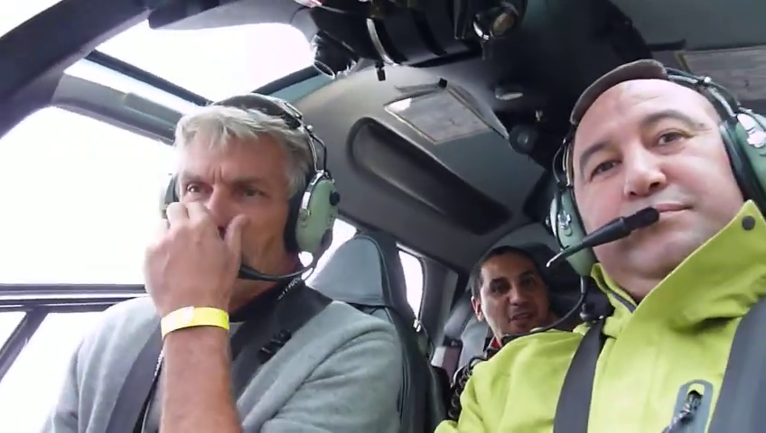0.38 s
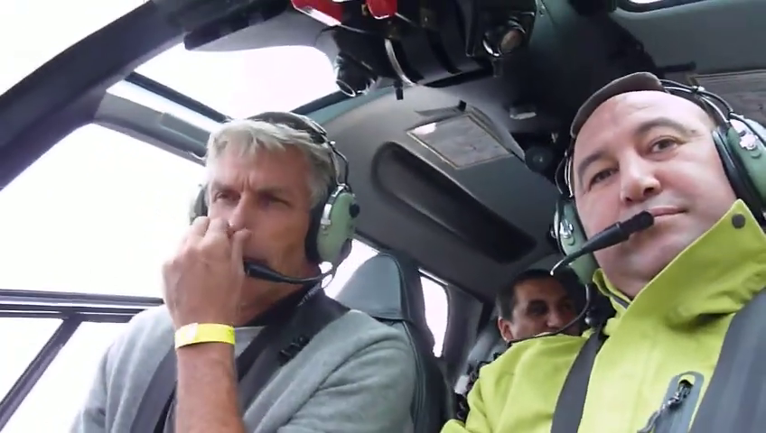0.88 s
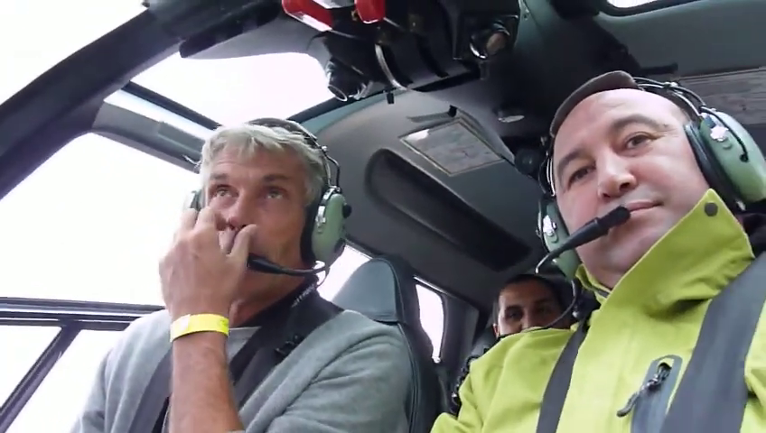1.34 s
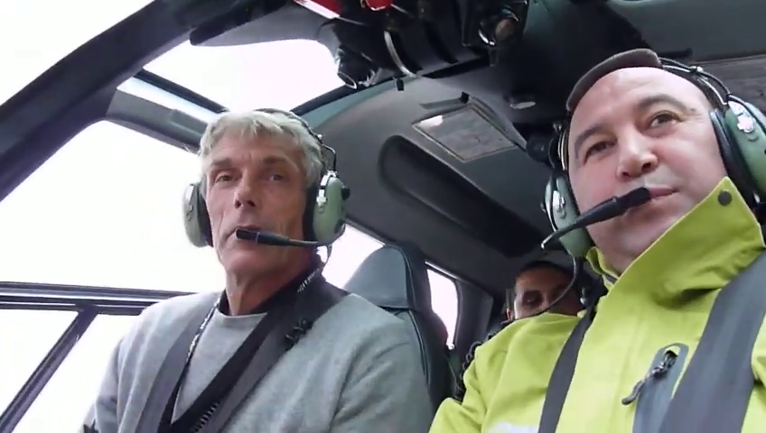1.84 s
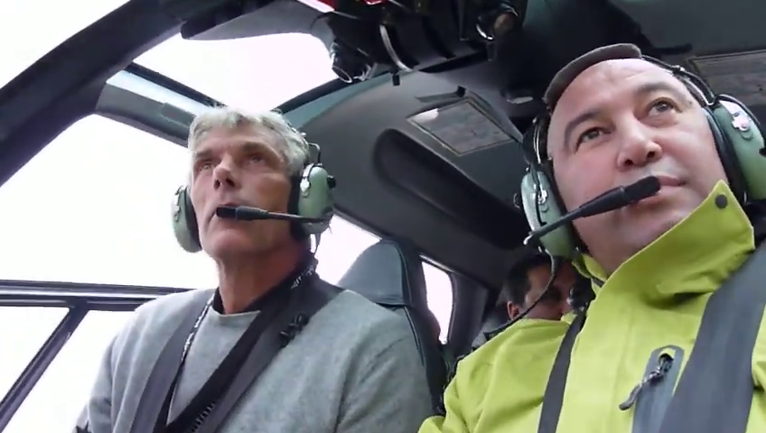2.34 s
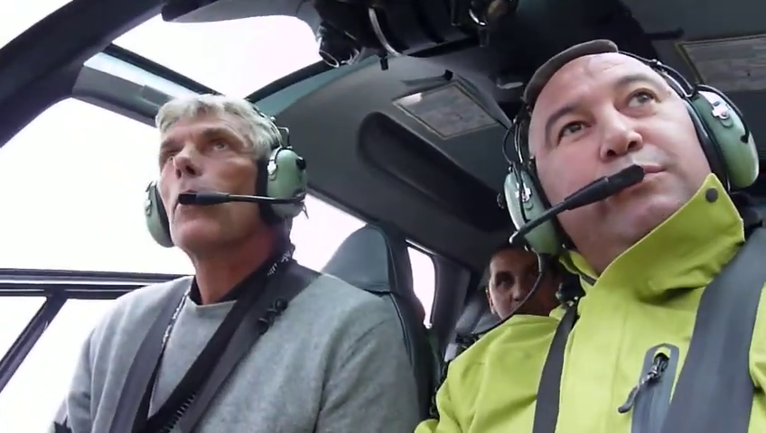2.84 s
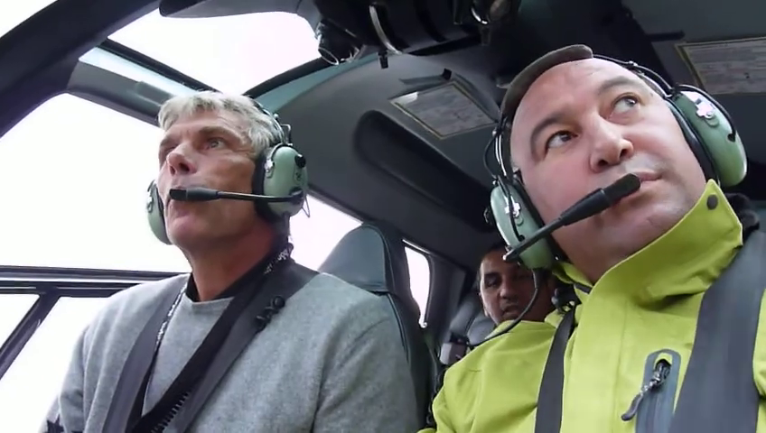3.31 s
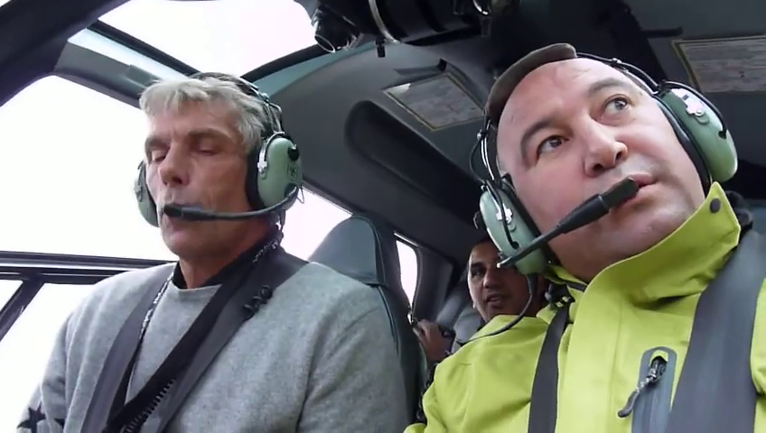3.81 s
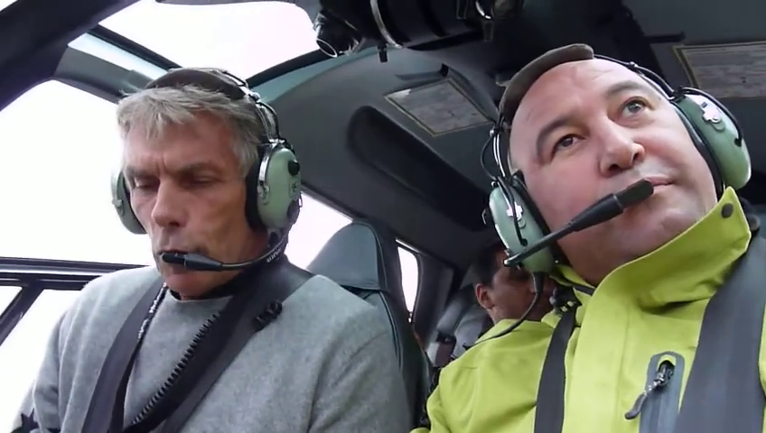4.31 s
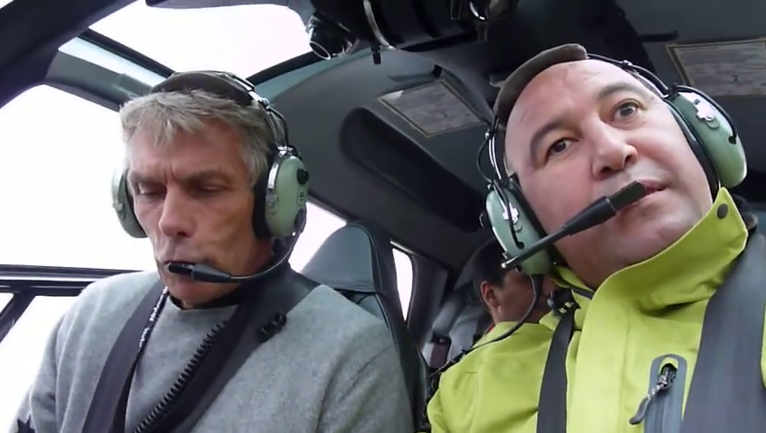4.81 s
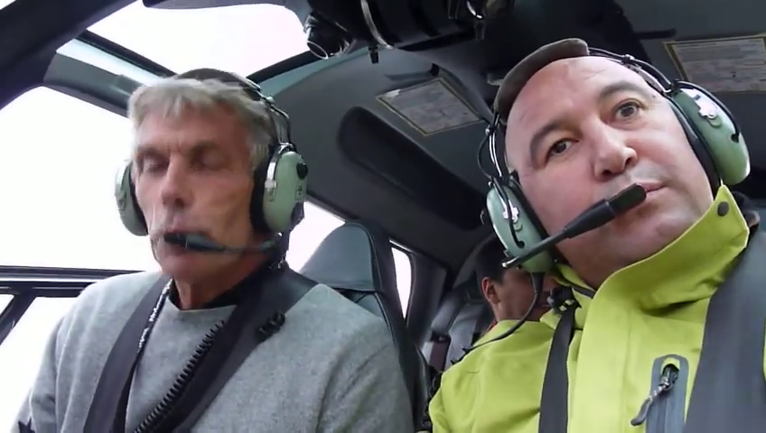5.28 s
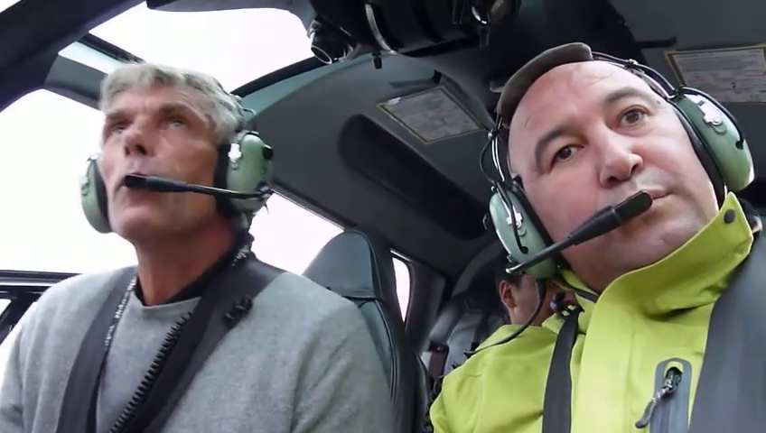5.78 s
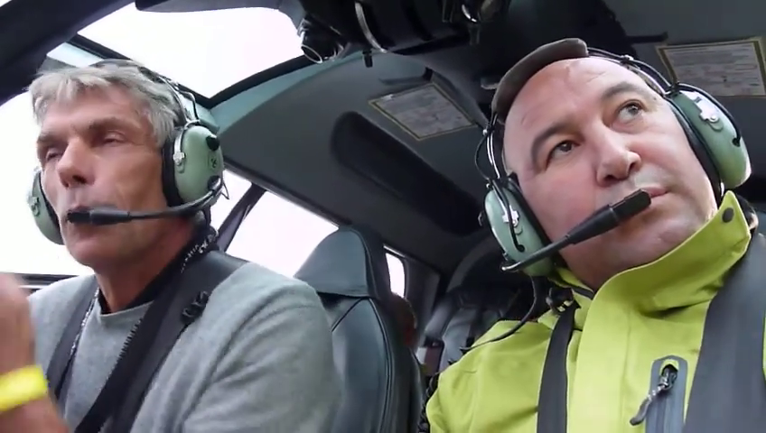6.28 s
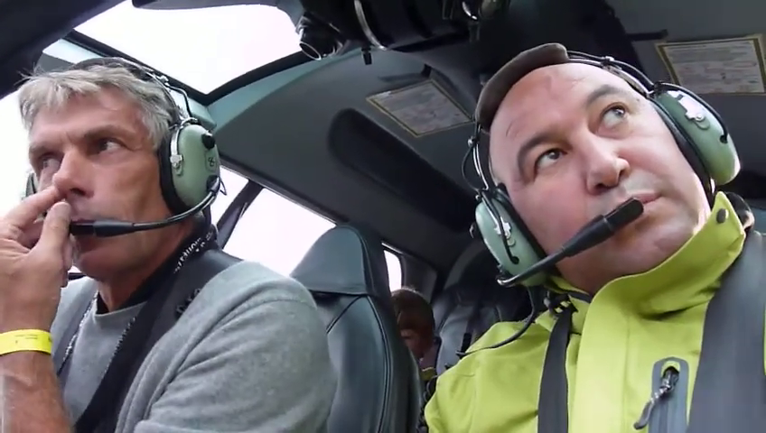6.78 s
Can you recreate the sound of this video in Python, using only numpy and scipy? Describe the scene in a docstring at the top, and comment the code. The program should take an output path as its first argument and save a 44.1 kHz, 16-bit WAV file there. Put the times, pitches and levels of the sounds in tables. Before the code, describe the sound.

A continuous helicopter interior drone, heard from between the front seats. Rapid rotor pulses blur into a fluttering throb over thick airframe rumble, with a steady low hum that weakens near the end. A panel drones more strongly through the middle, thin gear tones waver, and air and turbine hiss sit quietly on top. Small stereo recorder, bass centred, airy noise wider, limited treble.

```python
"""Inside a helicopter cabin in steady flight, heard in stereo between the front seats.
Each blade passage thumps the airframe (harmonics of the blade rate) and makes the noise throb.
The cabin booms (noise through its modes) and one panel drones; shafts hum and gears sing (wavering sines).
Air rushes past the skin (broad noise) and the turbine hisses (resonant noise). The small recorder cuts broad
notches with sharp nulls and a steep edge in the treble; its resampling leaves a thin whistling band at 8 kHz."""
import sys
import numpy as np
from scipy import signal
from scipy.fft import rfft, irfft, next_fast_len
from scipy.io import wavfile

SR = 44100
rng = np.random.default_rng(int(sys.argv[2]) if len(sys.argv) > 2 else 0)


def transcribe(signal):
    """Save signal, clipped to [-1, 1], as a 16-bit WAV file at the path in sys.argv[1]."""
    frames = np.atleast_2d(signal).T
    limited = np.clip(frames, -1, 1)
    pcm = np.round(limited * 32767).astype(np.int16)
    wavfile.write(sys.argv[1], SR, pcm)


def invert_db(level):
    """Linear amplitude ratio for a level in decibels (20 dB per decade), elementwise."""
    return 10 ** (np.asarray(level, dtype=float) / 20)


N = 303849
BLADE_HZ, FIRST_BLADE_S = 20.822, 0.0054

# level of the air rush outside: (time [s], level [dB])
RUSH_LEVEL = [(0, -32.5), (.5, -33), (1.2, -34.5), (1.9, -33), (2.5, -33.6), (4.1, -31.5), (5.8, -33.5),
              (6.89, -33)]
# air rush on the skin: (frequency [Hz], relative level per Hz [dB], left-right likeness [0-1], left-right [dB])
RUSH_SPECTRUM = [(20, -0.5, .1, -2.5), (300, -2.5, 0.2, 3.5), (1000, 8.5, 0.82, 3.5), (2000, 0, 0, 2),
                 (3200, 0, 0, -2.5), (4350, -6.5, 0.7, 6.5), (5000, -5, .3, -1.5), (6200, -5.5, 0.1, -1),
                 (6940, -8, 0.03, 0.5), (7460, -9.5, 0, -1), (8300, -17, 0.07, -1), (9050, -20, 0.1, -1)]
# resonances of the turbine hiss: (frequency [Hz], width [Hz], level [dB])
HISS_RESONANCES = [(3704, 380, 0.5), (4410, 330, -14)]
# centre of the turbine whine: (time [s], frequency [Hz])
WHINE_CENTRE = [(0, 3616), (.9, 3728), (1.8, 3720), (2.4, 3640), (4.0, 3750), (5.3, 3692), (6.89, 3720)]
# shaft hums and light gear meshes: (frequency [Hz])
LIGHT_TONE_HZ = [51.1, 191.4, 479.1, 500, 1635, 1688.3, 2287, 3486]
# the same tones: (rms level before wavering [dB], waver [dB], left-right [dB])
LIGHT_TONES = [(-56, 2.5, -2.5), (-39, 0.5, -1), (-54, 2.5, 0), (-55.5, 1, 5.5), (-54.5, 1, -4.5),
               (-60, 4.5, -2.5), (-62, -0.5, -11), (-60.5, 3, 4.5)]
# lines of the main gear: (frequency [Hz])
MAIN_GEAR_HZ = [1743.5, 2193.7, 2221.3]
# the same lines: (level against the mesh [dB], left-right [dB])
MAIN_GEAR_LINES = [(1, -1.5), (-5.5, -3), (-8, 0.5)]
# cabin boom without its modes: (frequency [Hz], relative level per Hz [dB])
BOOM_SPECTRUM = [(15, -39), (22, -18), (34, -18.5), (70, -8), (92, -12.5), (170, -6.5), (290, -12),
                 (490, -12.5), (800, -15), (1200, -23), (1700, -27.5), (2300, -31), (3200, -37.5),
                 (6000, -47.5), (9000, -50)]
# cabin and panel modes: (frequency [Hz], width [Hz], lift [dB])
CABIN_MODES = [(112.4, 14, 4), (135.5, 27.8, 7), (207, 25, 3.5), (246.5, 30.4, 7.5), (316, 18, 4.5),
               (367, 15, 2), (410.7, 25.4, 7.5), (452.4, 20, 3.5), (545, 17, 2.5), (880, 37, -0.5),
               (1078, 110, 3), (1332, 96, 5), (1484, 80, 3)]
# rotor thump: (multiple of the blade rate, rms level before swells [dB])
ROTOR_ORDERS = [(1, -36), (2, -29), (3, -35.5), (4, -36), (5, -42), (6, -30)]
# recorder notches: (frequency [Hz])
NOTCH_HZ = [2595, 4597, 5426, 7903, 8096]
# the same notches: (width [Hz], width of the null [Hz])
NOTCH_WIDTHS = [(830, 15), (750, 12), (392, 12), (600, 8), (298, 5)]


def rms_one(x):
    """Scales to rms 1, taken over all channels together."""
    return x / np.sqrt(np.mean(x ** 2) + 1e-20)


def in_time(rows):
    """One curve per column, sample by sample."""
    s, *columns = np.transpose(rows)
    return [np.interp(np.arange(N) / SR, s, column) for column in columns]


def over_hz(rows):
    """One curve per column over the spectral lines, on a log frequency axis."""
    hz, *columns = np.transpose(rows)
    lines = np.log(np.arange(1, N // 2 + 2) * SR / N)
    return [np.interp(lines, np.log(hz), column) for column in columns]


def drift(corner_hz):
    """Slow chance through two equal one-pole low-passes, run in; spread 1."""
    hop = 40  # samples between the points of the slow curve
    r = np.exp(-2 * np.pi * corner_hz * hop / SR)
    white = rng.standard_normal(N // hop + 2002)
    slow = signal.lfilter([1], [1, -2 * r, r * r], white)[2000:]
    slow = rms_one(slow - slow.mean())
    return np.interp(np.arange(N) / hop, np.arange(len(slow)), slow)


def spell(from_s, to_s, fade_s, lift_db):
    """A change in dB that fades in, holds and fades out."""
    s = np.arange(N) / SR
    return lift_db * (np.tanh((s - from_s) / fade_s) - np.tanh((s - to_s) / fade_s)) / 2


def pole_pair(hz, width_hz):
    """Second-order polynomial with its root pair at one frequency; damping sets the width."""
    r = np.exp(-np.pi * width_hz / SR)
    return np.array([1, -2 * r * np.cos(2 * np.pi * hz / SR), r * r])


def narrow_noise(white, hz, width_hz):
    """Noise through one resonance; rms 1."""
    return rms_one(signal.lfilter([1, 0, -1], pole_pair(hz, width_hz), white))


def tone(hz, waver_db, waver_rad):
    """A sine of nominal rms 1 whose level and phase wander."""
    angle = 2 * np.pi * (hz * np.arange(N) / SR + rng.random()) + waver_rad * drift(0.8)
    return np.sqrt(2) * np.sin(angle) * invert_db(waver_db * drift(0.8))


def pan(db):
    """Left and right gains for a level difference, positive to the left."""
    return invert_db(np.array([[0.5], [-0.5]]) * db)


def blade_angle():
    """Phase of the blade passage, zero as a blade goes over."""
    return 2 * np.pi * BLADE_HZ * (np.arange(N) / SR - FIRST_BLADE_S)


def throb_db(once_db, twice_db, lag_rad):
    """Level swing at the blade rate and its double."""
    angle = blade_angle() - lag_rad
    return once_db * np.cos(angle) + twice_db * np.cos(2 * angle)


def alias_band():
    """The recorder's thin alias band between its two top notches: resonant noise, unrelated left and right."""
    hz, width_hz, level_db = 8000, 35, -53.5
    once = narrow_noise(rng.standard_normal((2, N)), hz, width_hz)
    return invert_db(level_db + 1.5 * drift(8)) * narrow_noise(once, hz, width_hz * 2)


def rush(level_db, gust):
    """Turbulent air on the skin: broad noise, mostly unlike on the two sides."""
    spectrum_db, alike, side_db = over_hz(RUSH_SPECTRUM)
    alike = np.clip(alike, 0, 1)
    mid, side = rfft(rng.standard_normal((2, N)))
    # this mix of mid and side correlates left and right by the likeness
    both = np.sqrt(1 + alike) * mid + np.sqrt(1 - alike) * side * [[1], [-1]]
    noise = rms_one(irfft(both * pan(side_db) * invert_db(spectrum_db), N))
    return invert_db(level_db + 0.52 * gust + throb_db(0.9, 0.3, lag_rad=2.4)) * noise


def turbine(level_db, likeness):
    """Broad hiss in two resonances around a narrower whine that slides and swells once."""
    mid, side, core_mid, core_side = rng.standard_normal((4, N))
    spread = np.sqrt(1 - likeness) * np.array([[1], [-1]])
    white = np.sqrt(1 + likeness) * mid + spread * side
    core_white = np.sqrt(1 + likeness) * core_mid + spread * core_side
    hiss = 0
    for k, (hz, width_hz, db) in enumerate(HISS_RESONANCES):
        hiss = hiss + (-1) ** k * invert_db(db) * narrow_noise(white, hz, width_hz)  # alternating polarity
    core_hz = 3717
    core = narrow_noise(core_white, core_hz, width_hz=150)
    # the analytic signal is turned so that the band slides to its centre
    shift = 2 * np.pi * np.cumsum(in_time(WHINE_CENTRE)[0] - core_hz) / SR
    analytic = signal.hilbert(core, next_fast_len(N))[:, :N]
    whine_db = -0.5 + spell(from_s=0.69, to_s=1.8, fade_s=0.2, lift_db=5.1) + 0.6 * drift(5.8)
    whine = np.real(analytic * np.exp(1j * shift)) * invert_db(whine_db)
    swing_db = 0.5 * drift(8) + throb_db(0.7, 0.4, lag_rad=1.2)
    return invert_db(level_db + swing_db) * (hiss + whine) * pan(-1.2)


def panel():
    """One panel drones in a narrow band, louder for a while: noise twice through a resonance."""
    hz, width_hz = 740, 40
    level_db = -45 + spell(from_s=0.8, to_s=4.3, fade_s=0.5, lift_db=9)
    once = narrow_noise(rng.standard_normal(N), hz, width_hz)
    return invert_db(level_db) * narrow_noise(once, hz, width_hz * 2) * pan(-0.3)


def gears():
    """Rotating shafts and meshing teeth: wavering sines; one light mesh and the main gear swell for a while."""
    light = 0
    for hz, (db, waver_db, side_db) in zip(LIGHT_TONE_HZ, LIGHT_TONES):
        light = light + invert_db(db) * tone(hz, waver_db, waver_rad=0.29) * pan(side_db)
    main = 0
    for hz, (db, side_db) in zip(MAIN_GEAR_HZ, MAIN_GEAR_LINES):
        main = main + invert_db(db) * tone(hz, waver_db=1.0, waver_rad=0.33) * pan(side_db)
    main_db = -51 + spell(from_s=2.4, to_s=6.1, fade_s=0.3, lift_db=5)
    mesh_db = -55.5 + spell(from_s=1.0, to_s=3.8, fade_s=0.3, lift_db=8)
    mesh = invert_db(mesh_db) * tone(1471.7, waver_db=2.0, waver_rad=0.6) * pan(-8.5)
    return light + mesh + invert_db(main_db) * main


def boom(level_db, upper_db, gust):
    """Airframe noise shaped by the cabin modes; the same noise reaches both sides."""
    x = irfft(rfft(rng.standard_normal(N)) * invert_db(over_hz(BOOM_SPECTRUM)[0]), N)
    for hz, width_hz, lift_db in CABIN_MODES:
        # the ratio of zero width to pole width sets the lift
        x = signal.lfilter(pole_pair(hz, width_hz * invert_db(lift_db)), pole_pair(hz, width_hz), x)
    x = rms_one(x)
    upper = signal.sosfiltfilt(signal.butter(2, 900, "high", fs=SR, output="sos"), x)
    # the bass is buffeted in lumps of its own, the upper part follows the gusts
    bass = (x - upper) * invert_db(0.63 * drift(12))
    upper = upper * invert_db(upper_db + 1.3 * gust)
    return invert_db(level_db + throb_db(0.85, 0.52, lag_rad=0.59)) * (bass + upper) * pan(-0.41)


def rotor():
    """A suction pulse per blade: harmonics nearly in step, the upper ones less steady."""
    # the sixth order hums strongly, then weakens; the other orders start weaker and settle
    hum_db = -9.5 + spell(from_s=0.042, to_s=5.1, fade_s=0.11, lift_db=10.8)
    thump_db = 0.65 + spell(from_s=-0.5, to_s=1.5, fade_s=1, lift_db=-5.5)
    out = np.zeros(N)
    for order, db in ROTOR_ORDERS:
        swell_db = hum_db if order == 6 else thump_db
        unsteady = invert_db(swell_db + 0.37 * order * drift(2.0))
        angle = order * blade_angle() + 0.14 * order * drift(0.4)
        out -= np.sqrt(2) * invert_db(db) * unsteady * np.cos(angle)
    return out * pan(-0.7)


def scene():
    """All sources as heard between the front seats, with the recorder's alias band added."""
    s = np.arange(N) / SR
    rush_db = in_time(RUSH_LEVEL)[0]
    # the upper boom and the hiss follow the swing of the rush in part
    swing_db = rush_db - rush_db.mean()
    boom_db = -18.3 - 0.0929 * s
    upper_db = -1.6 + 0.23 * s + 0.67 * swing_db  # against the boom
    hiss_db = -40 + 0.4 * swing_db
    gust = 0.88 * drift(3.9) + 0.5 * drift(11)
    outside = rush(rush_db, gust)
    machinery = turbine(hiss_db, likeness=0.17) + gears()
    airframe = panel() + boom(boom_db, upper_db, gust)
    helicopter = outside + machinery + airframe + rotor()
    return helicopter + alias_band()


def top_cut(x):
    """Nothing passes above the cut-off."""
    return signal.sosfilt(signal.butter(12, 8850, fs=SR, output="sos"), x)


def record(dry):
    """The small recorder: broad notches with sharp nulls in the treble, then a steep top cut."""
    x = dry
    for hz, (width_hz, null_hz) in zip(NOTCH_HZ, NOTCH_WIDTHS):
        x = signal.lfilter(pole_pair(hz, null_hz), pole_pair(hz, width_hz), x)
    # 60 dB down from 9360 Hz upwards
    x = signal.sosfilt(signal.cheby2(12, 60, 9360, fs=SR, output="sos"), x)
    return top_cut(x)


dry = scene()
out = record(dry)
transcribe(out)
```